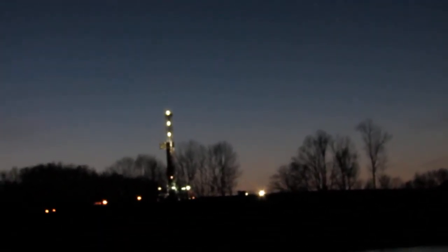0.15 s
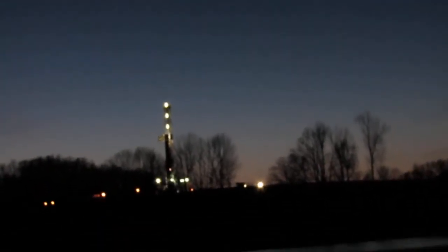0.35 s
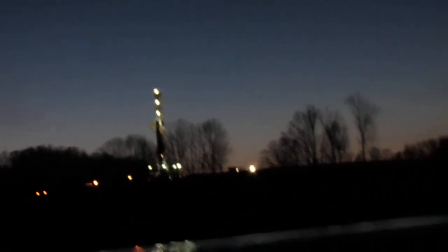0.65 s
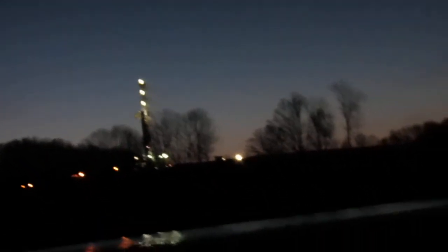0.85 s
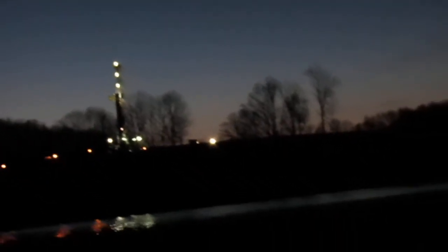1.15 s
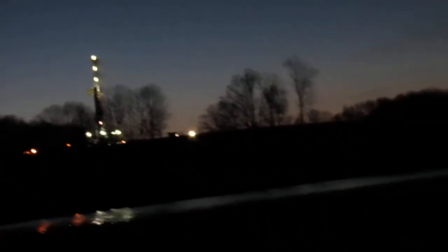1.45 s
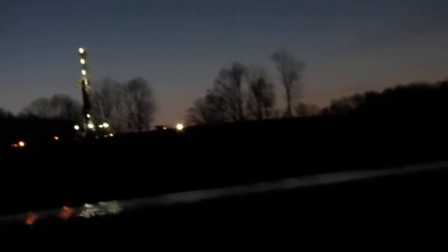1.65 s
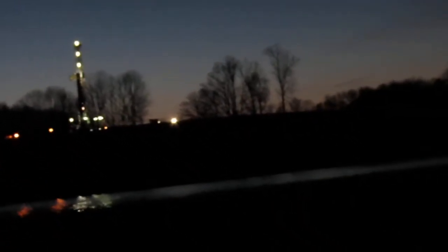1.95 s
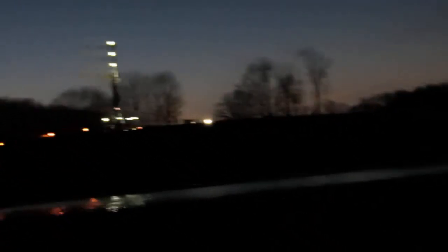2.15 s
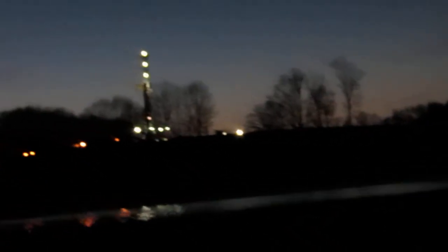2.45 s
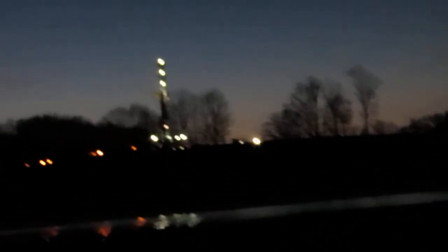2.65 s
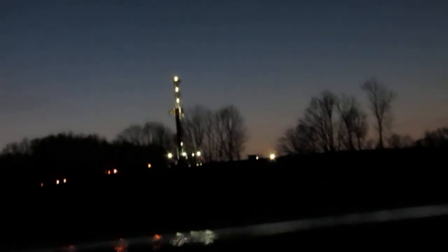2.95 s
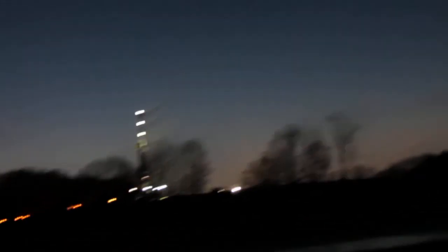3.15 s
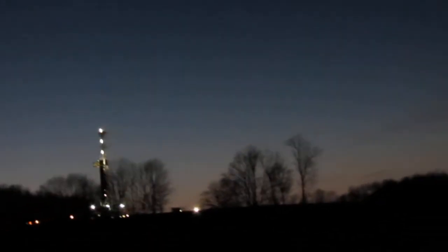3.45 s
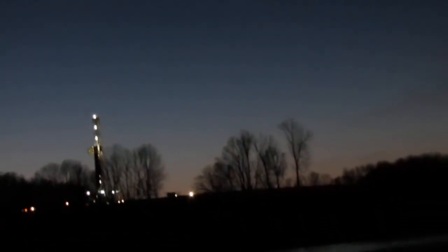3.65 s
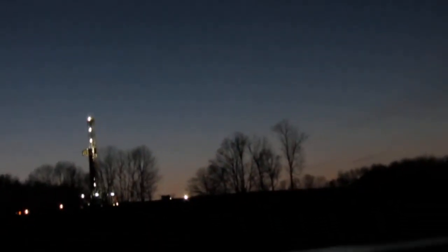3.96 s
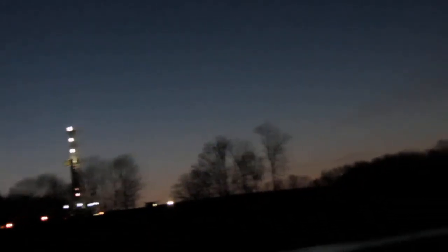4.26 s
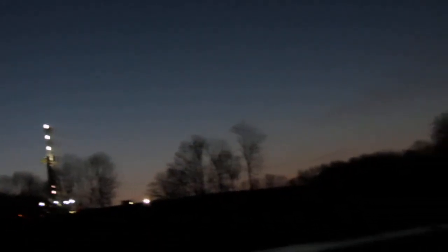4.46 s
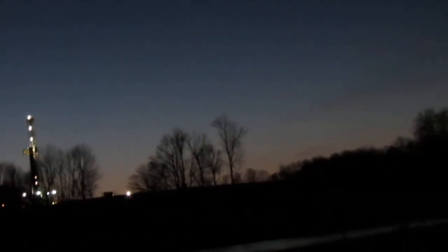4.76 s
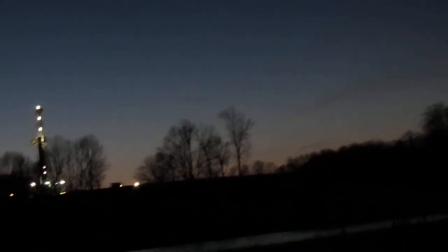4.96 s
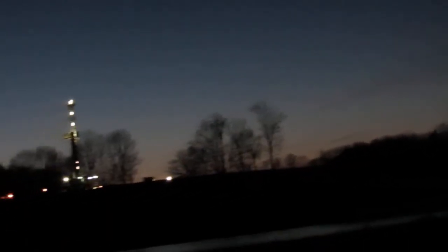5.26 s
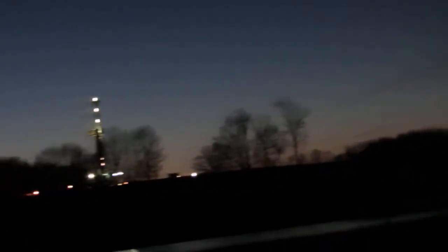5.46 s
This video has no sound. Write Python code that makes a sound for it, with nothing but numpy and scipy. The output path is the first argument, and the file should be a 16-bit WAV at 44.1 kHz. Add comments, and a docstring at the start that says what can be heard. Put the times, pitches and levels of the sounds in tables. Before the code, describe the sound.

Hundreds of small frogs peep without pause in a wet field at dusk, each call a short, high, rising whistle, with a few nearer ones standing out on the left. Far behind them a drilling rig's diesel engines drone quietly, and one briefly revs and settles midway. The hand-held microphone picks up a few faint ticks, two soft low gusts and a light sleeve swish near the end.

```python
"""A wet field at dusk. From the start, hundreds of spring peepers overlap, loosely in step, each peep
a short rising whistle; far behind them the diesel engines of a drilling rig drone. In the first second
the hand-held camera's case ticks faintly and a sleeve brushes by. At 2 s one diesel revs up, thumps at
the top of its rev and settles by 3.5 s. Between 3 and 4 s come two soft gusts and a few more ticks.
Just after 4 s the sleeve swishes, and the frogs call on."""
import sys
import numpy as np
from scipy import signal
from scipy.fft import rfft, irfft
from scipy.io import wavfile

SR = 44100
rng = np.random.default_rng(int(sys.argv[2]) if len(sys.argv) > 2 else 0)


def waveform_to_disk(signal):
    """Save audio, clipped to [-1, 1], as 16-bit WAV at the path in sys.argv[1]."""
    frames = np.transpose(np.atleast_2d(signal))
    scaled = np.clip(frames, -1, 1) * 32767
    samples = np.round(scaled).astype(np.int16)
    wavfile.write(sys.argv[1], SR, samples)


N = 246519
TIME = np.arange(N) / SR
FREQS = np.fft.rfftfreq(N, 1 / SR)
LEFT_LAG_S = 0.00023  # the field lies to the right, so the left microphone hears it later


def undb(db):
    """Decibels to gain."""
    return 10 ** (np.asarray(db) / 20)


def curves(table, at=TIME):
    """Breakpoint curves: each later column, joined by straight lines along the first."""
    points, *columns = np.transpose(table)
    return [np.interp(at, points, column) for column in columns]


def unit(x):
    """Scale to rms 1."""
    return x / np.sqrt(np.mean(x ** 2))


def pan(db):
    """Left and right gains for a left-minus-right level, steady or a curve."""
    return undb(np.vstack([db, -db]) / 2)


def add(out, s, sound):
    """Mix a sound in at time s."""
    i = int(s * SR)
    a, b = max(i, 0), min(i + sound.shape[1], N)
    if b > a:
        out[:, a:b] += sound[:, a - i:b - i]


def walk(rate_hz):
    """Smooth random drift of rms 1."""
    return unit(irfft(rfft(rng.standard_normal(N)) * np.exp(-(FREQS / rate_hz) ** 2), N))


def noise(colour, width):
    """Coloured stereo noise of rms 1; width is the gain of side against mid."""
    hz, db = np.transpose(colour)
    gain = undb(np.interp(np.log(FREQS + 1), np.log(hz), db))
    mid, side = rfft(rng.standard_normal((2, N)))
    return unit(irfft(gain * np.array([mid + width * side, mid - width * side]), N))


def low_rumble(calm_db=-51):
    """Light air rumbles; the lows swell with the diesel's thump at the top of its rev, then two gusts."""
    # rumble spectrum: (frequency [Hz], relative density [dB])
    rumble = [(12, -21.5), (26, 9.5), (42, 8.5), (54, -1.5), (75, -2.5), (200, -50)]
    # low swells, the diesel's thump and then two soft gusts: (time [s], half length [s], level [dB])
    swells = [(2.644, 0.22, -48), (3.3, .15, -44), (3.844, .25, -42.5)]
    strength = undb(calm_db) + sum(undb(db) * np.exp(-((TIME - s) / half) ** 2) for s, half, db in swells)
    return pan(-3.5) * noise(rumble, width=0.5) * strength


def distant_tone(phase, waver_db=2):
    """Moving air wavers a far tone's level, and its phase the more the higher it is."""
    mean_hz = phase[-1] / (2 * np.pi * TIME[-1])
    drift = mean_hz / 350 * walk(4)
    return np.sqrt(2) * undb(waver_db * walk(8)) * np.sin(phase + drift + 2 * np.pi * rng.random())


def body_shadow(x):
    """The camera body delays and shades distant sound between its two microphone ports."""
    # port differences: (frequency [Hz], left behind right [rad], left minus right [dB])
    ports = [(0, 0, -1.8), (2000, 1.3, -3), (4000, 0.2, -2.5), (5600, 0, -1.5), (7000, 2.5, -1.3),
             (12400, 3.4, .5), (15500, 6.2, 1.7)]
    lag, pan_db = curves(ports, FREQS)
    delay = np.array([np.exp(-1j * lag), np.ones(len(lag))])
    return irfft(rfft(x) * pan(pan_db) * delay, N)


def rig(cruise_hz=33.5, full_hz=40, throb=0.12, strain_db=0.2841):
    """Diesel exhaust, generator hum and a fan roar that throbs with the engine and swells on the rev."""
    # diesel speed: (time [s], cycle rate [Hz])
    speed = [(0.0, 32.77), (0.09, 33.58), (0.54, 32.2), (1.04, 33.43), (1.99, 32.83), (2.38, 38.83),
             (2.55, 40.43), (2.83, 39.02), (3.43, 33.2), (3.56, 32.18), (5.59, 34.88)]
    # exhaust harmonics: (multiple of the cycle rate, relative level [dB])
    exhaust = [(1, -2), (2, -2), (3, -1.5), (4, -12), (5, -14), (6, -17), (7, -15.5), (9, -15), (10, -19),
               (11, -16), (13, -23.5), (23, -21.5)]
    # fader for the drone of harmonics 3 and 4: (time [s], level [dB])
    drone = [(0, -34.5), (.33, -57), (.55, -41), (1.5, -42), (2.5, -49), (2.85, -42), (3.3, -50.5),
             (3.55, -41), (4.1, -42), (5.59, -52)]
    # generators at constant speed: (frequency [Hz], level [dB])
    generators = [(88, -56.5), (128, -51.5), (150, -58.5), (188, -59.5), (250, -61.5), (437, -59),
                  (1147, -61), (1484, -63.5)]
    # spectrum of fans and pumps: (frequency [Hz], relative density [dB])
    fans = [(15, -27), (45, 4), (110, 4), (200, -3), (440, -2.5), (650, -5), (950, -9), (1300, -6),
            (2000, -12), (3400, -19.5), (4600, -23), (6200, -27), (8000, -27.5), (10000, -32.5),
            (15500, -38.5)]
    rate_hz = curves(speed)[0]
    phase = 2 * np.pi * np.cumsum(rate_hz) / SR
    load = np.clip((rate_hz - cruise_hz) / (full_hz - cruise_hz), 0, None) ** 2
    machinery_db = -44.5 + 2 * load
    thump_db = -49 + 5.5 * load
    drone_db = curves(drone)[0]
    note = 0
    for k, db in exhaust:
        whine_db = machinery_db + 1.5 + strain_db * k * load  # the whine brightens under load
        level_db = thump_db if k <= 2 else drone_db if k <= 4 else whine_db
        note = note + undb(db + level_db) * distant_tone(k * phase)
    hum = sum(undb(db - 0.1) * distant_tone(2 * np.pi * hz * TIME) for hz, db in generators)
    roar = noise(fans, width=0.64) * (1 + throb * np.sin(phase)) * undb(machinery_db + 4.4)
    return body_shadow(note + hum + roar)


def sleeve(attack_s=0.014, release_s=0.04, sag_db_per_s=20, trim_db=-3, grain_db=2):
    """Nylon slides in tiny catches; each stroke sets in quickly, slackens and stops."""
    # sleeve strokes: (start [s], length [s], level [dB])
    strokes = [(0.844, 0.081, -54), (4.201, 0.2, -44), (4.235, 0.065, -46.5), (4.42, 0.17, -53.5)]
    # nylon swish spectrum: (frequency [Hz], relative density [dB])
    cloth = [(1500, -25), (4500, -6), (5450, 0), (5650, 5), (5900, -4), (7800, -10.5), (8600, -8),
             (10500, -8), (12000, -8), (14000, -8), (15500, -13)]
    envelope = 0
    for s, length, level_db in strokes:
        age = np.clip(TIME - s, 0, length)
        gate = np.minimum(age / attack_s, 1) * np.minimum((length - age) / release_s, 1)
        envelope = envelope + gate * undb(level_db - sag_db_per_s * age)
    return pan(-4.5) * noise(cloth, width=0.95) * envelope * undb(trim_db + grain_db * walk(150))


def case_ticks(ring_db=2, ring_t60=0.028, snap_db=-14, snap_t60=0.007):
    """The camera case ticks under the fingers: a bright snap, then a dull ring."""
    # ticks: (time [s], level [dB], left minus right [dB])
    ticks = [(.288, -39, -2), (0.432, -36.5, 8), (.485, -29, 7), (.691, -48, 0), (3.032, -43, 2),
             (3.322, -43, -3), (3.815, -47, -8)]
    # case resonance: (frequency [Hz], relative density [dB])
    resonance = [(200, -1), (700, 2.5), (1150, 10), (1800, -6.5), (4000, -24.5), (15000, -42)]
    out = np.zeros((2, N))
    ring = noise(resonance, width=0.55)
    snap = rng.standard_normal((2, N))
    for s, db, pan_db in ticks:
        age = np.clip(TIME - s, 0, 0.1)
        tick = ring * undb(ring_db - 60 * age / ring_t60) + snap * undb(snap_db - 60 * age / snap_t60)
        out += pan(pan_db) * undb(db) * (TIME >= s) * tick
    return out


def woods(x, wet_db=-7.5, t60=0.18):
    """Trunks and ground scatter a short diffuse echo."""
    t = np.arange(SR // 2) / SR
    echo = rng.standard_normal((2, len(t))) * undb(-60 * t / t60)
    echo /= np.sqrt(np.sum(echo ** 2, axis=1, keepdims=True))
    return x + undb(wet_db) * signal.fftconvolve(x, echo, axes=1)[:, :N]


def peep(length, start_hz, rise_hz, lag_s, bend=0.394):
    """One whistle: the pitch climbs and flattens as the vocal sac fills."""
    # faint overtones: (fifth [dB], octave [dB])
    overtones = (-32, -42.5)
    fifth, octave = undb(overtones)
    progress = np.linspace(0, 1, int(length * SR))
    pitch = start_hz + rise_hz * (progress + bend * progress * (1 - progress))
    phase = 2 * np.pi * (np.cumsum(pitch) / SR + rng.random() - pitch * np.array([[lag_s], [0]]))
    swell = np.abs(np.sin(np.pi * progress)) ** 0.46
    return swell * (np.sin(phase) + fifth * np.sin(1.5 * phase) + octave * np.sin(2 * phase))


def far_frogs(count=900, middle_hz=2705, spread_hz=335, rise_hz=205, length=0.125,
              wave_hz=4.42, crest_s=0.115, bunching=0.22, swell_s=0.037):
    """The chorus bed: frogs of different size and distance, their calls drawn together into waves."""
    # the chorus as the camera turns from it: (time [s], level [dB], left minus right [dB])
    chorus = [(0, -23.5, 4), (2.8, -23.5, 3.5), (4.4, -24, 1.7), (4.85, -26, 0.5), (5.59, -23.5, 0.5)]
    # brief swells and lulls: (time [s], level change [dB])
    swells = [(.07, 3), (.42, 0.5), (.71, -1.5), (1.14, -1), (1.81, -3), (1.901, -0.5), (2.05, -2),
              (3.149, -4), (3.38, -3.5), (3.83, -2.5), (4.19, 2)]
    out = np.zeros((2, N))
    times = (np.arange(count) + rng.random(count)) / count * (N / SR + length) - length / 2
    omega = 2 * np.pi * wave_hz
    times -= bunching * np.sin(omega * (times - crest_s)) / omega
    # -1 is the largest, lowest frog, +1 the smallest; middling ones are commonest and loudest
    smallness = 2 * rng.beta(3, 3, count) - 1
    traits = np.clip(rng.standard_normal((count, 5)), -2, 2)
    for s, small, (nearness, stretch, effort, side, bearing) in zip(times, smallness, traits):
        duration = length * np.exp(0.15 * stretch)
        rise = rise_hz * np.exp(0.14 * effort)
        start_hz = middle_hz + spread_hz * small - rise / 2
        level_db = -7 * small ** 2 - 3.6 * small + 1.5 * nearness
        call = peep(duration, start_hz, rise, LEFT_LAG_S + 0.00009 * bearing)
        add(out, s - duration / 2, undb(level_db) * pan(3 * side) * call)
    chorus_db, pan_db = curves(chorus)
    swell_db = sum(db * np.exp(-((TIME - s) / swell_s) ** 2) for s, db in swells)
    return unit(out) * undb(chorus_db + swell_db) * pan(pan_db)


def near_frogs(trim_db=1.8, typical_hz=2600.4, typical_rise_hz=239.5, lag_spread_s=0.00004):
    """Foreground peeps that stand out of the chorus, each from its own direction."""
    # peeps: (start [s], length [s], starting pitch [Hz], level [dB], left minus right [dB])
    peeps = [(0.0, 0.17, 2599, -23, 14), (.07, 0.16, 2413, -31.5, 9), (.21, .12, 2575, -26.5, 27),
             (.23, 0.18, 2970, -37, 14), (.355, 0.16, 2525, -24.5, 15), (.743, 0.097, 2495, -27.5, 20),
             (.8, 0.15, 2400, -26.5, 6), (0.914, .11, 2318, -31.5, 6), (.99, 0.14, 2560, -23.5, 9.5),
             (1.243, 0.14, 2615, -25, 6), (1.26, 0.13, 3010, -45, 5), (1.422, 0.16, 2704, -26.5, 16),
             (1.58, 0.13, 2617, -25.5, 21), (1.62, .13, 2350, -33.5, 6), (1.69, 0.18, 2968, -32.5, 16),
             (1.844, 0.12, 2590, -27, 4), (2.207, 0.15, 2306, -29.5, 7), (2.365, 0.098, 2592, -24, 7),
             (2.56, 0.13, 2540, -24, 21.5), (2.722, 0.11, 3057, -39, 0), (2.992, 0.14, 2970, -37, 18),
             (2.997, .12, 2680, -33, 3), (3.19, 0.13, 2642, -28, 10), (3.21, 0.13, 2327, -30, 14.5),
             (3.446, 0.14, 2500, -26, 14), (3.58, .14, 2359, -36, 8), (3.645, .15, 2570, -27, 1.5),
             (4.041, 0.13, 2360, -28.5, 8), (4.096, .14, 3028, -41, 1), (4.13, .13, 2562, -26, 20),
             (4.2, 0.12, 2294, -31, 8.5), (4.38, .18, 2960, -41.5, 4), (4.48, 0.13, 2329, -27.5, 25),
             (4.55, 0.12, 2542, -23.5, 5), (5.016, 0.11, 2264, -34, 8.5), (5.05, .11, 2513, -31, -7),
             (5.48, .14, 3010, -48, 4), (5.51, .12, 2530, -27.5, -1)]
    out = np.zeros((2, N))
    for s, length, hz, level_db, pan_db in peeps:
        lag_s = LEFT_LAG_S + lag_spread_s * rng.standard_normal()
        rise_hz = typical_rise_hz * (hz / typical_hz) ** 2.1  # small, high frogs climb further
        add(out, s, undb(level_db + trim_db) * unit(pan(pan_db)) * peep(length, hz, rise_hz, lag_s))
    return out


def scene():
    """Frogs in front, the rig behind, a low rumble beneath and handling at the microphone."""
    return woods(near_frogs() + far_frogs()) + rig() + low_rumble() + sleeve() + case_ticks()


def record(dry, cutoff_hz=15700):
    """The camera cuts the top of the treble."""
    return signal.sosfilt(signal.ellip(10, 0.2, 80, cutoff_hz, fs=SR, output="sos"), dry)


dry = scene()
out = record(dry)
waveform_to_disk(out)
```